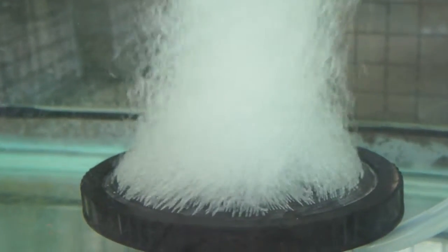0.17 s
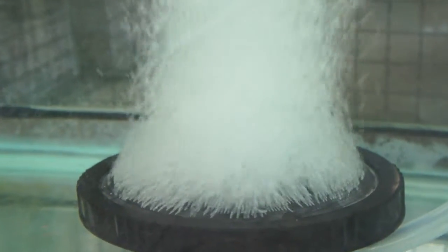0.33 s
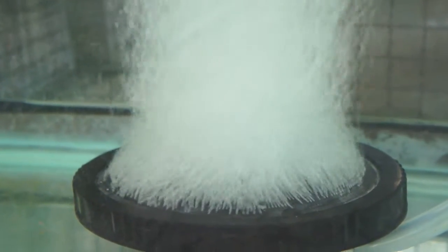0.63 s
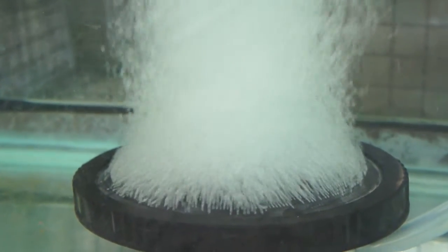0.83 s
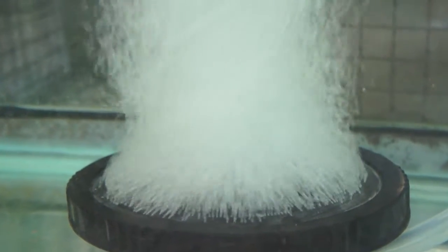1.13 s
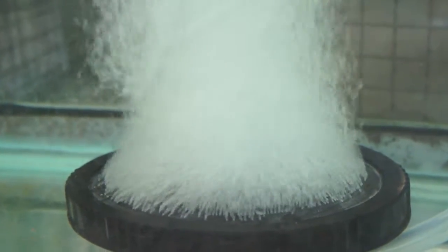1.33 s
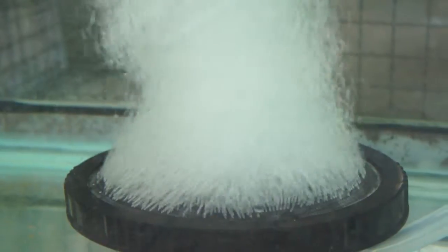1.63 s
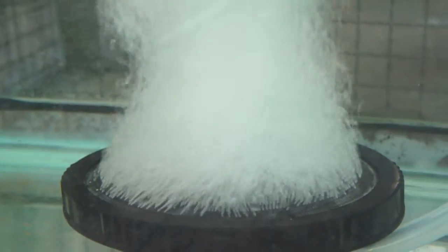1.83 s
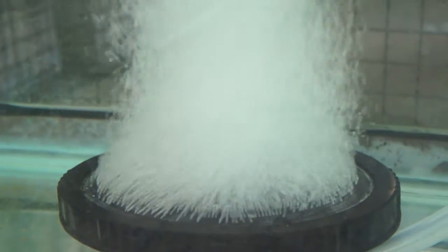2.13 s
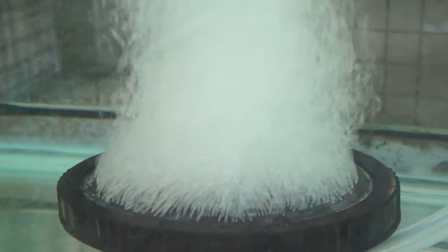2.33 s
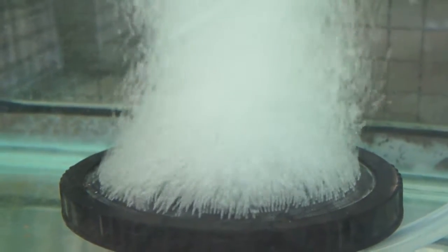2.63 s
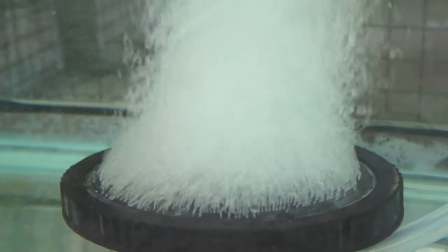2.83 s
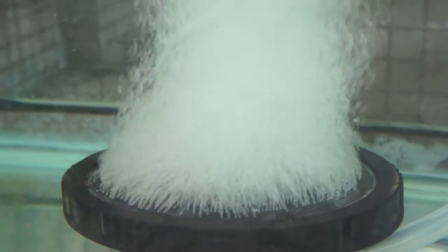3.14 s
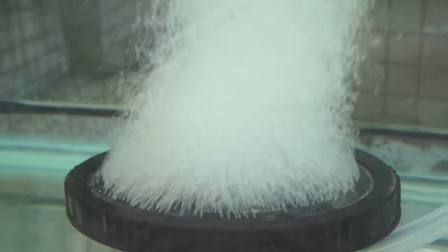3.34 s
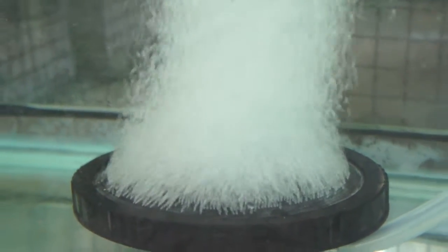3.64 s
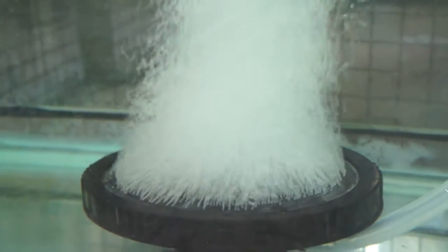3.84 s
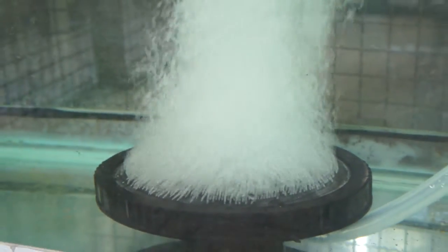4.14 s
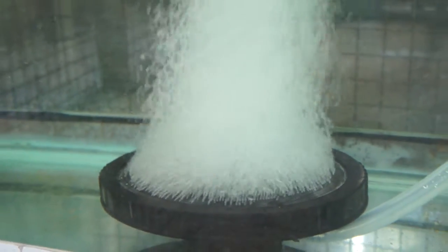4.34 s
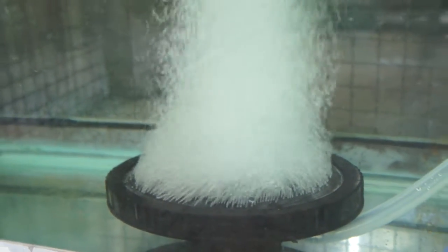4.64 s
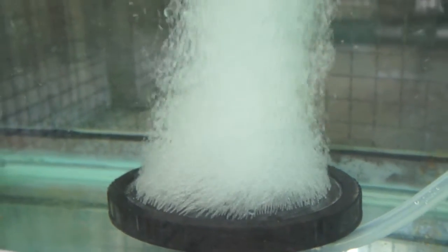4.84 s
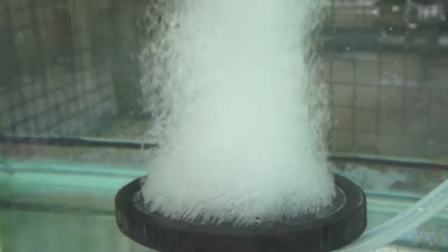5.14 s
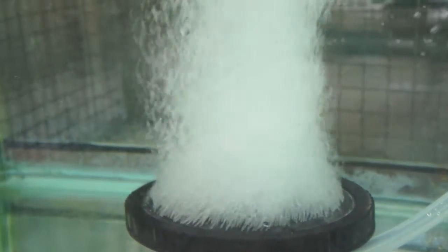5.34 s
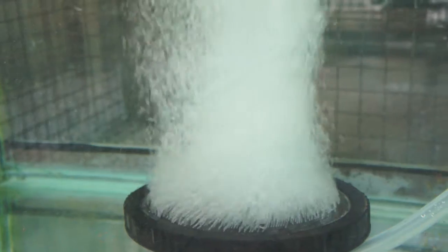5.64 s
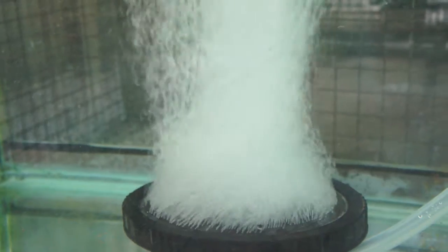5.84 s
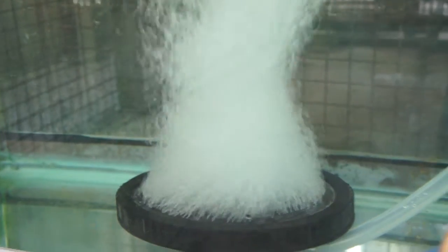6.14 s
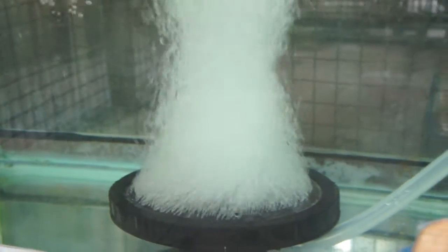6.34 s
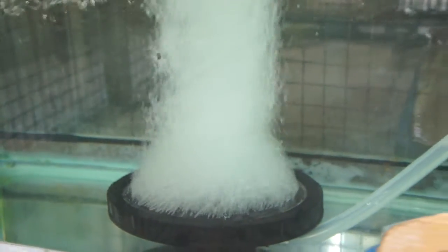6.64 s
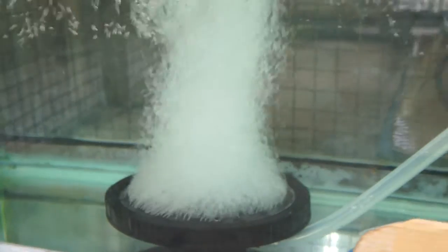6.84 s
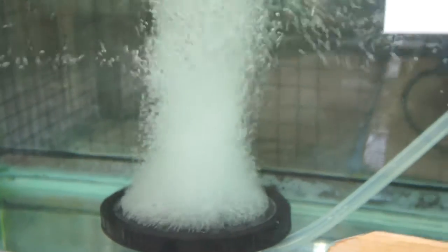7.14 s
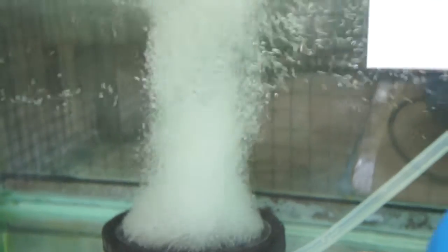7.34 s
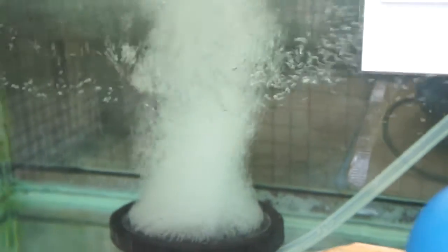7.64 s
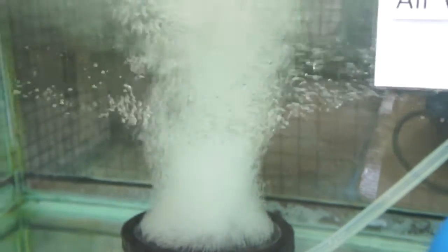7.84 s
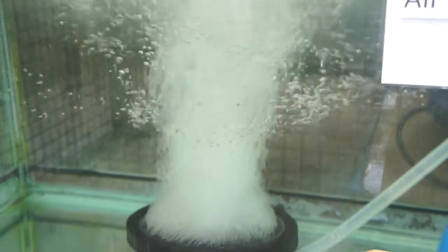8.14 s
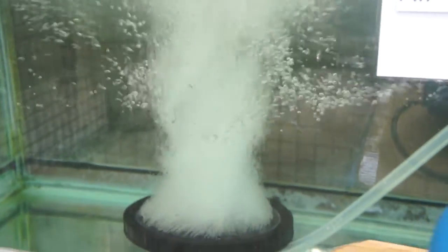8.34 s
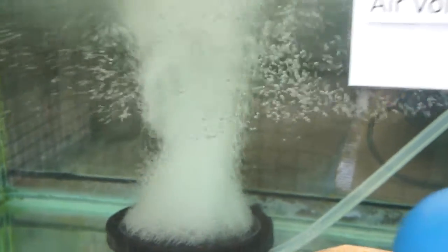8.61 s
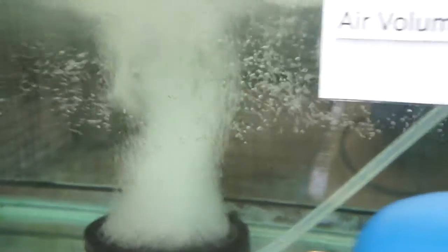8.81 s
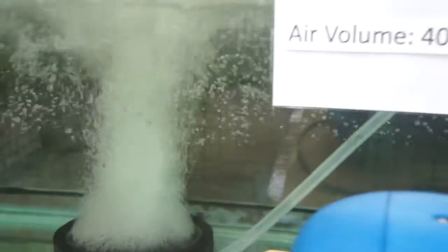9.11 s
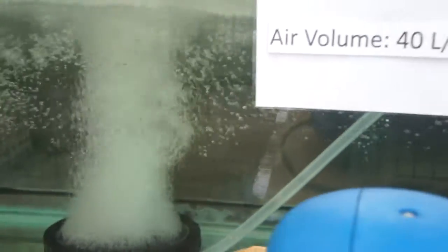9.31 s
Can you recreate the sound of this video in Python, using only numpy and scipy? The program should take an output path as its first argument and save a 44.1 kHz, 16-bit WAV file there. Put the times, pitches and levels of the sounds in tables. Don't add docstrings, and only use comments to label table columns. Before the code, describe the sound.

An air pump hums steadily beside a glass water tank, a dense mains buzz dominated by one strong tone around 660 hertz. Under it air rushes softly and hisses. A whoosh swells to its height after four seconds and fades by about seven, while small splashes, gurgles and bubble plinks dot the surface. Late on the main tone sinks as the handheld stereo microphone steps back in a reflective room.

```python
import sys
import numpy as np
from scipy import signal
from scipy.fft import rfft, irfft, next_fast_len
from scipy.io import wavfile
from scipy.ndimage import uniform_filter1d

SR = 44100
rng = np.random.default_rng(int(sys.argv[2]) if len(sys.argv) > 2 else 0)


def digitize_waveform(pressure):
    field = np.atleast_2d(pressure).T
    bounded = np.clip(field, -1, 1)
    quanta = np.round(bounded * 32767).astype(np.int16)
    wavfile.write(sys.argv[1], SR, quanta)


def level_to_linear(level):
    exponent = np.asarray(level, float) / 20
    return 10 ** exponent


N = 417627

# time in seconds, part of the way walked back 0-1.
WALK = [(0, 0), (4.8, .014), (5.5, .055), (6.1, .102), (6.6, .287), (7, .526), (7.4, .659), (7.8, .758),
        (8.2, .829), (8.6, .857), (9.1, .976), (9.47, 1)]

# frequency in Hz, likeness of the ports 0-1.
PORT_LIKENESS = [(30, .3), (50, .9), (300, .93), (600, .75), (900, .54), (1300, .36), (2700, .12),
                 (4000, .2), (6000, .4), (8000, .07)]
# frequency in Hz, left lead in rad.
PORT_LEAD = [(40, 2), (150, 0.6), (400, 0.05), (900, -1.5), (1300, -0.4), (1900, -1), (2700, -1.67),
             (4000, -3), (6000, -3.5), (8000, -3.5)]
# frequency in Hz, left over right in dB.
PORT_LEAN = [(40, 1), (90, 0), (150, 4.5), (400, 7.5), (600, -1.5), (1300, 3.5), (1900, 1.8), (4000, 1.1),
             (11000, 0.9)]
# frequency in Hz, left lead in rad.
HUM_LEAD = [(60, 1), (300, 0), (600, -.9), (720, -.3), (840, -.7), (1100, -1.4), (1560, -1.3), (1690, -.7)]

# frequency in Hz, density in dB per Hz.
AIR_SPECTRUM = [(30, -88), (90, -69), (150, -67), (270, -64.5), (400, -66), (900, -68.5), (1300, -70.5),
                (1900, -72), (2700, -76.5), (4000, -80.5), (7000, -86.5), (8000, -89.5), (10800, -92.5)]
# frequency in Hz, density in dB per Hz.
RUMBLE_SPECTRUM = [(40, -22), (70, -2.5), (90, -2.5), (130, -4.5), (300, -3.5), (600, -8.5), (900, -49)]
# frequency in Hz, density in dB per Hz.
HISS_SPECTRUM = [(400, -32), (700, 7.5), (1300, 1.5), (1900, 2), (2600, 2.5), (4000, -9.5), (6000, -21),
                 (8000, -41)]
# frequency in Hz, density in dB per Hz.
WHINE_SPECTRUM = [(6000, -26), (6500, -1.5), (6950, -4), (7300, -6.5), (7900, -30.5)]
# time in seconds, hiss level in dB.
WHOOSH_PASS = [(0, -55.5), (1.4, -53), (2.1, -47.5), (3.3, -41.5), (4.3, -35.5), (5, -38), (5.9, -37),
               (6.4, -46), (9.47, -55.5)]
# centre in seconds, level in dB, half length in seconds.
SURGES = [
    (.1, -42, 0.56),
    (3.195, -48, 0.22),
    (4.293, -47, 0.31),
    (6, -46.5, 0.33),
    (6.698, -42.5, .35),
    (7.7, -48, 0.27),
]

# centre in Hz, width in Hz, start in seconds, end in seconds, level in dB.
WHISTLES = [
    (6160, 340, -4, 3.6, -56.5),
    (8860, 300, -5, 4.1, -66.5),
    (5780, 200, 6.5, 10, -58.5),
    (4070, 170, 2.5, 6.3, -59),
]
# centre in Hz, width in Hz, start in seconds, end in seconds, level in dB.
DRONE = (85, 6, 3.5, 7.6, -49)

# peak time in seconds, peak in dB, centre in Hz, spread in octaves, length in seconds.
SPLASHES = [(0.515, -49.5, 7950, .5, 0.0089), (.535, -49, 3080, .18, .04), (.915, -46, 4500, .8, .012),
            (0.998, -51.5, 7000, .7, .015), (1.994, -45, 5500, 0.68, .015), (2.2, -52.5, 8600, 0.24, 0.022),
            (2.286, -50, 8500, 0.67, 0.023), (3.17, -54, 9000, .5, .012), (3.776, -52, 8800, .5, 0.017),
            (3.989, -40, 3800, 0.54, 0.014), (4.445, -51, 7000, .9, .015), (4.635, -48.5, 6000, 1, 0.013),
            (4.75, -57, 9500, 0.37, .012), (7.059, -52, 8000, .7, .015), (7.35, -39, 9500, .5, .0015),
            (7.37, -50.5, 8500, .7, .03), (7.59, -54, 9000, .5, .012), (7.665, -50.5, 7500, .7, .02),
            (7.967, -49, 5500, 1, .012), (8.742, -56, 7600, .12, .03), (8.755, -40, 2300, 0.7, .016),
            (8.88, -51, 5500, 0.71, .015), (8.96, -55, 9500, .15, .015),
            (.514, -44, 3300, .25, .008), (.528, -50, 5500, .35, .012), (.56, -51, 3180, .2, .05),
           (.99, -50, 3000, .7, .1), (3.753, -52, 3000, .6, .1), (4.42, -45.5, 2800, .6, .09),
           (5.8, -53, 3300, 0.55, .08), (7.351, -44.5, 2500, .8, 0.015), (7.3525, -39, 9000, 0.56, .002),
           (7.373, -46.5, 2500, .8, .06), (8.787, -52, 4500, 0.69, .03), (8.888, -52, 2500, 0.66, .05)]
# start in seconds, peak in dB, pitch in Hz, t60 in seconds.
PLINKS = [(.511, -38, 3100, .018), (.525, -36, 3050, .03), (.553, -43, 2400, .04), (.571, -42, 2950, .025),
          (.913, -44, 3000, .03), (1.98, -45, 5100, .03), (2.125, -50, 6200, .03), (3.985, -41, 3700, .04),
          (3.989, -42, 4800, .03), (4.63, -45, 5300, .03), (7.254, -45, 7100, .015),
          (8.539, -36, 5400, .016), (8.755, -43, 3900, .03), (8.87, -50, 6300, .04)]

# multiple of mains, near level in dB, far level in dB, near left over right in dB.
STROKE_LINES = [(1, -50, -65, -2), (2, -39, -41, 1), (3, -36, -38, 2), (4, -43, -43, 0), (5, -37, -37, 5),
                (6, -47.5, -54, 3), (7, -43, -50, 4), (9, -44.5, -56, 7), (10, -38.5, -53, 4),
                (12, -45, -54, 5), (13, -53, -52, 2), (14, -35.5, -38.5, 7), (18, -37, -44, -3),
                (21, -47, -55, 10), (22, -54, -51, 5), (24, -47, -53, 5), (26, -44, -50, -1),
                (27, -48, -52, -5), (28, -43, -52, -1), (29, -50.5, -62, 5)]
# multiple of mains, near level in dB, far level in dB, left over right in dB.
VALVE_LINES = [(39, -59, -61, -3), (43, -55, -65, 1), (45, -63, -61, -5), (55, -63, -67, -5),
               (56, -61, -68, -5), (57, -64, -70, -1), (63, -68, -72, -4), (67, -68, -72, -4),
               (69, -67, -72, -3), (76, -61, -71, -2), (78, -69, -71, -2), (80, -68, -71, -3)]
# near level in dB, change on the walk in dB, left lead in rad, delay in rad,
# change of delay on the walk in rad.
CASING_PATHS = [
    (-20.2, -25, -.55, 0, 0),
    (-39.95, 0, .91, 3.34, 2.93),
    (-41.58, 10, -1.54, 3.24, -8.79),
]

MAINS_HZ, SAG_HZ_PER_S, NOMINAL_AT_S = 60.02, .003, 2
CASING_MULTIPLE, CASING_LEAN_DB = 11, 2
SMEAR_RAD, START_RAD = -.812, 2.26
FAINT_TO_MULTIPLE, FAINT_DB, FAINT_FADE_DB, FAINT_LEAN_SCATTER_DB = 32, -59, 1, 6
FAR_LEAN_DB = 4
SHADED_MULTIPLES, SHADE_POWER = range(9, 15), 2.6
SHORT_WAVE_MULTIPLE = 20
NULL_AT, NULL_WIDTH, NULL_DEPTH_DB = 0.63, .07, 4
AIR_DB, AIR_FADE_DB, AIR_LIFT_DB_PER_DB = -33, 1, 0.067
RUMBLE_UNDER_HISS_DB = 10.5
WHINE_FROM_S, WHINE_TO_S, WHINE_RAMP_S, WHINE_DB, WHINE_REST_DB = 3.1, 5.23, 0.75, -52.5, -65
TOP_HZ = 11040
SIDES = np.array([[.5], [-.5]])


def unit(x):
    return x / np.sqrt(np.mean(x ** 2) + 1e-20)


def along(points, hz):
    f, v = np.transpose(points)
    return np.interp(np.log(hz + 1), np.log(f + 1), v)


def curve(rows):
    s, value = np.transpose(rows)
    return np.interp(np.arange(N) / SR, s, value)


def wobble(rate_hz):
    knots = rng.standard_normal(int(N * rate_hz / SR) + 4)
    return np.interp(np.arange(N) * rate_hz / SR, np.arange(len(knots)), knots)


def rush(spectrum, patchy_db):
    z = signal.stft(rng.standard_normal((2, N)), nperseg=512)[2]
    field = uniform_filter1d(rng.standard_normal(z.shape[1:]), size=6, axis=0)
    field = uniform_filter1d(field, size=12, axis=1)
    pair = signal.istft(z * level_to_linear(patchy_db * unit(field)), nperseg=512)[1][:, :N]
    m = next_fast_len(N + SR // 4)
    hz = np.fft.rfftfreq(m, 1 / SR)
    turn = np.arccos(np.clip(along(PORT_LIKENESS, hz), 0, 1)) / 2
    mid, side = rfft(pair, m) * [np.cos(turn), np.sin(turn)]
    skew = level_to_linear(along(PORT_LEAN, hz) / 2) * np.exp(.5j * along(PORT_LEAD, hz))
    both = np.array([(mid + side) * skew, (mid - side) / skew])
    return unit(irfft(both * level_to_linear(along(spectrum, hz)), m)[:, :N])


def air():
    t = np.arange(N) / SR
    pass_db = curve(WHOOSH_PASS)
    air_db = AIR_DB - AIR_FADE_DB * curve(WALK) + AIR_LIFT_DB_PER_DB * (pass_db - pass_db.mean())
    flutter_db = 0.43 * wobble(8) + 0.22 * wobble(3.7)
    spectrum = sorted(AIR_SPECTRUM + [(45, -77), (6000, -84.0)])
    steady = level_to_linear(air_db + flutter_db) * rush(spectrum, patchy_db=1.14)
    surges = sum(level_to_linear(db) * np.exp(-((t - s) / half_s) ** 2) for s, db, half_s in SURGES)
    rumble = (level_to_linear(pass_db - RUMBLE_UNDER_HISS_DB) + surges) * rush(RUMBLE_SPECTRUM, patchy_db=1.0)
    hiss = level_to_linear(pass_db + 1.1 * wobble(5)) * rush(HISS_SPECTRUM, patchy_db=0.8)
    near = np.clip(np.minimum(t - WHINE_FROM_S, WHINE_TO_S - t) / WHINE_RAMP_S, 0, 1)
    whine = (level_to_linear(WHINE_REST_DB) + level_to_linear(WHINE_DB) * near) * rush(WHINE_SPECTRUM, patchy_db=-2.0)
    return steady + rumble + hiss + whine


def whistles():
    t = np.arange(N) / SR
    out = np.zeros((2, N))
    for centre_hz, width_hz, begin_s, end_s, db in WHISTLES + [DRONE]:
        band = [(centre_hz - 2 * width_hz, -40), (centre_hz - width_hz / 2, -3), (centre_hz, 0),
                (centre_hz + width_hz / 2, -3), (centre_hz + 2 * width_hz, -40)]
        heard = np.clip(np.minimum(t - begin_s, end_s - t) / .3, 0, 1)
        out += level_to_linear(db) * heard * rush(band, patchy_db=2)
    return out


def splashes():
    out, size = np.zeros((2, N + SR)), SR // 3
    t = np.arange(size) / SR
    hz = np.fft.rfftfreq(size, 1 / SR) + 1
    for peak_s, db, centre_hz, octaves, length_s in SPLASHES:
        noise = rng.standard_normal((3, size))
        grains = noise[:2] - 0.36 * noise[2] * [[1], [-1]]
        colour = np.exp(-.5 * (np.log2(hz / centre_hz) / octaves) ** 2) / np.sqrt(hz)
        puff = unit(irfft(rfft(grains) * colour, size))
        u = t / (length_s / 2)
        start = round((peak_s - length_s / 2) * SR)
        out[:, start:][:, :size] += level_to_linear(db + 6.5) * puff * u * np.exp(1 - u)
    return out[:, :N]


def plinks():
    out = np.zeros((2, N + SR))
    t = np.arange(SR // 10) / SR
    for s, db, hz, t60_s in PLINKS:
        ring = level_to_linear(db - 60 * t / t60_s) * (1 - np.exp(-t / .0015))
        phase = 2 * np.pi * hz * t * (1 + 2 * t) + along(PORT_LEAD, hz) * SIDES / 2
        out[:, round(s * SR):][:, :len(t)] += 2.8 * ring * np.sin(phase)
    return out[:, :N]


def casing(back):
    total = 0
    for db, change_db, lead, delay, turn in CASING_PATHS:
        gain = level_to_linear(db + change_db * back + SIDES * CASING_LEAN_DB)
        total = total + gain * np.exp(1j * (SIDES * lead + delay + turn * back))
    return total


def pump():
    back = curve(WALK)
    null_db = -NULL_DEPTH_DB * np.exp(-((back - NULL_AT) / NULL_WIDTH) ** 2)
    t = np.arange(N) / SR
    cycle = 2 * np.pi * (MAINS_HZ * t - SAG_HZ_PER_S * (t - NOMINAL_AT_S) ** 2 / 2) - .083

    strong = [round(row[0]) for row in STROKE_LINES] + [CASING_MULTIPLE]
    faint = [(k, FAINT_DB, FAINT_DB - FAINT_FADE_DB, FAINT_LEAN_SCATTER_DB * rng.standard_normal())
             for k in range(1, FAINT_TO_MULTIPLE + 1) if k not in strong]
    lines = [(*row, FAR_LEAN_DB, HUM_LEAD) for row in STROKE_LINES + faint]
    lines += [(*row, row[-1], PORT_LEAD) for row in VALVE_LINES]

    casing_phase = CASING_MULTIPLE * cycle + SMEAR_RAD * CASING_MULTIPLE ** 2 + START_RAD
    tone = level_to_linear(0.14 * wobble(6.0)) * np.exp(1j * casing_phase)
    hum = np.sqrt(2) * np.real(casing(back) * tone)
    for k, near_db, far_db, near_lean_db, far_lean_db, leads in lines:
        lost = back ** SHADE_POWER if round(k) in SHADED_MULTIPLES else back
        lean_db = near_lean_db + back * (far_lean_db - near_lean_db)
        level_db = near_db + lost * (far_db - near_db) + SIDES * lean_db
        flutter_db = (0.26 + 1.64 * back) * wobble(3.3)
        lead = along(leads, k * MAINS_HZ)
        if k >= SHORT_WAVE_MULTIPLE:
            level_db = level_db + null_db
            lead = lead - 0.34 * back
        gain = level_to_linear(level_db + flutter_db) * np.sqrt(2)
        room_phase = .15 * k * rng.standard_normal() * back + .08 * wobble(2)
        hum += gain * np.cos(k * cycle + SMEAR_RAD * k ** 2 + START_RAD + room_phase + SIDES * lead)
    return hum


def scene():
    return air() + whistles() + splashes() + plinks() + pump()


def low_pass(x):
    return signal.sosfilt(signal.butter(12, 12190, fs=SR, output="sos"), x)


def record(dry):
    m = next_fast_len(N + SR // 4)
    in_band = np.fft.rfftfreq(m, 1 / SR) < TOP_HZ
    mix = irfft(rfft(dry, m) * in_band, m)[:, :N]
    return low_pass(mix)


dry = scene()
out = record(dry)
digitize_waveform(out)
```